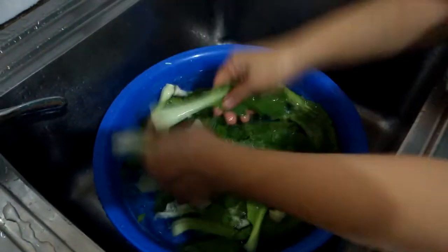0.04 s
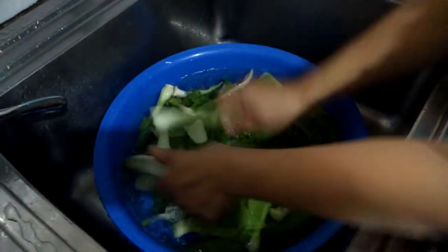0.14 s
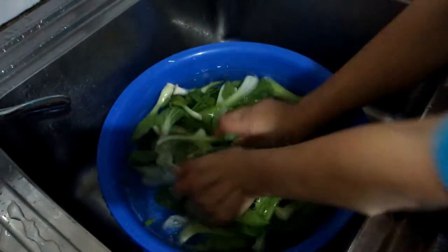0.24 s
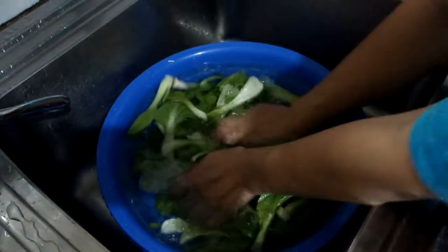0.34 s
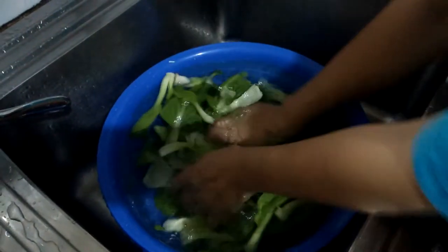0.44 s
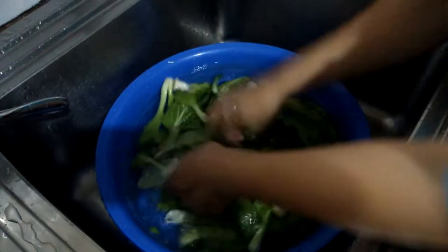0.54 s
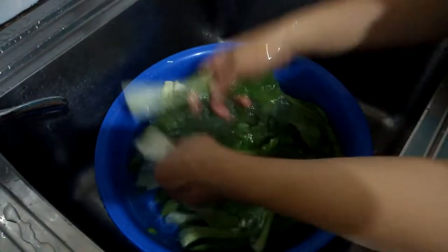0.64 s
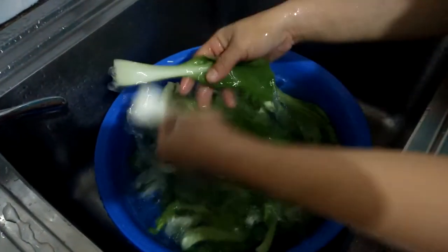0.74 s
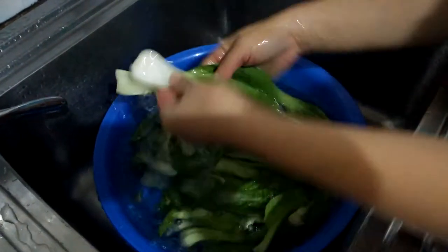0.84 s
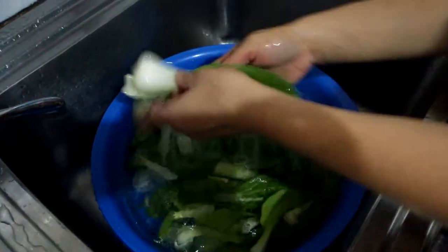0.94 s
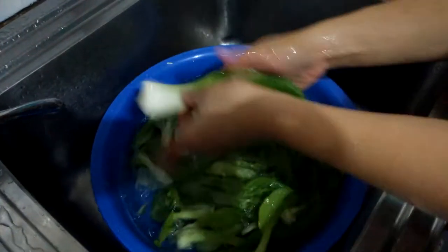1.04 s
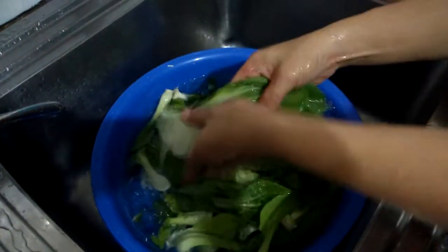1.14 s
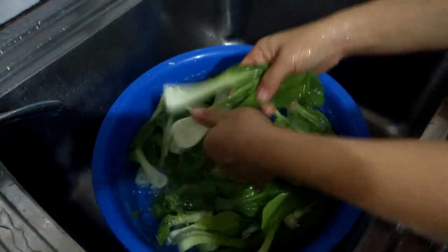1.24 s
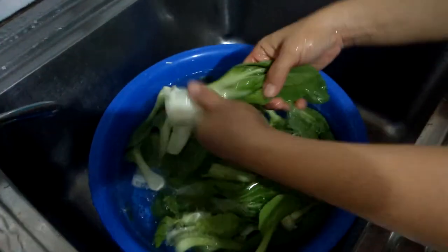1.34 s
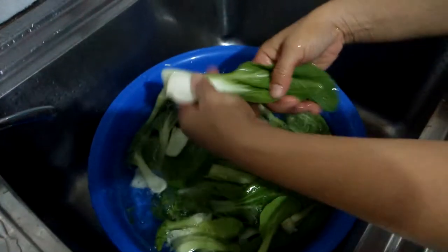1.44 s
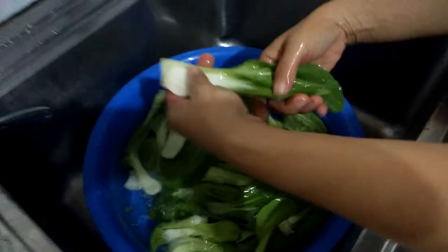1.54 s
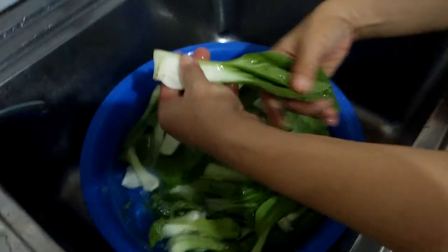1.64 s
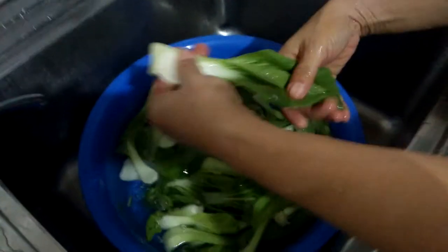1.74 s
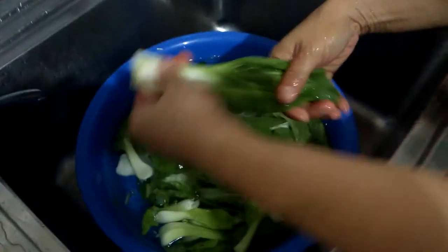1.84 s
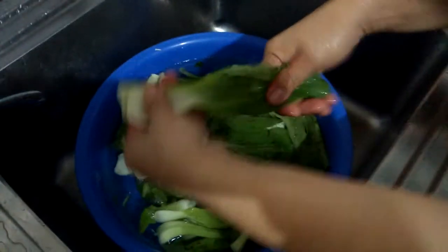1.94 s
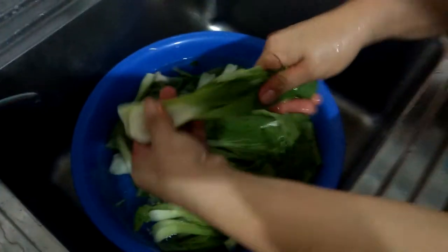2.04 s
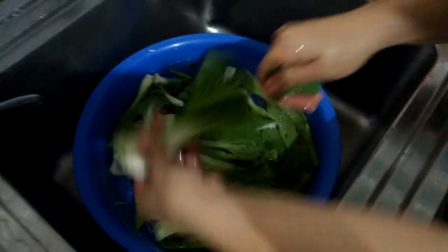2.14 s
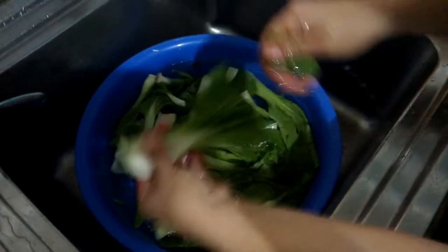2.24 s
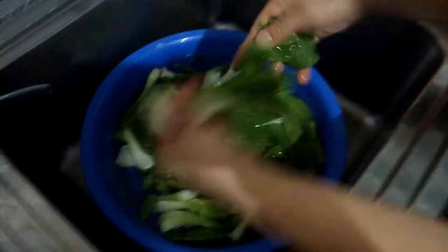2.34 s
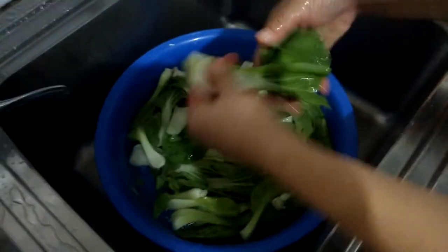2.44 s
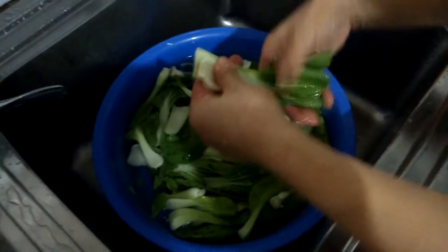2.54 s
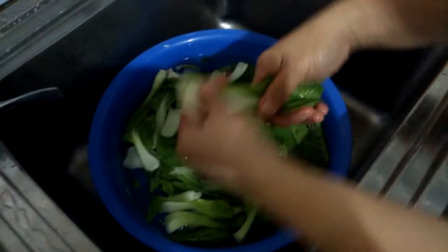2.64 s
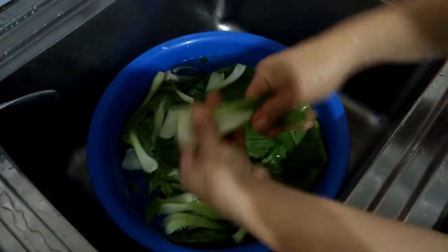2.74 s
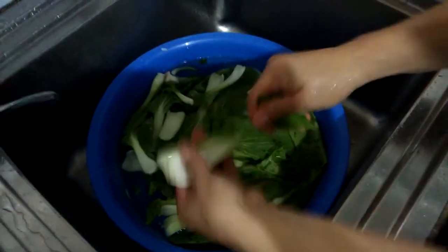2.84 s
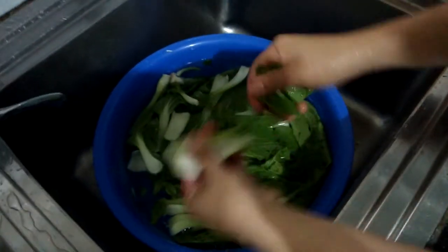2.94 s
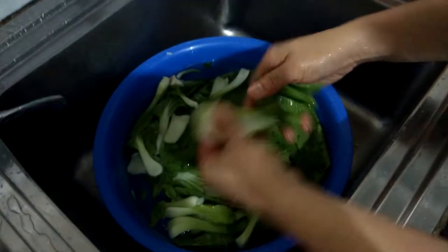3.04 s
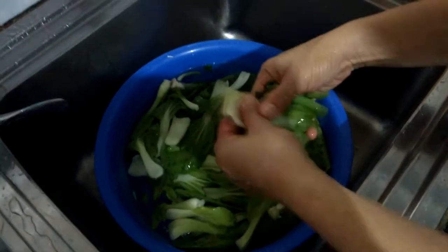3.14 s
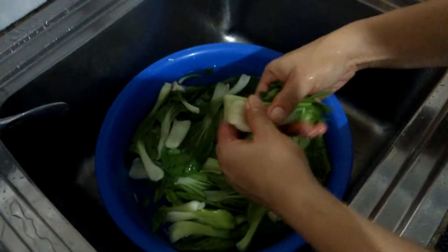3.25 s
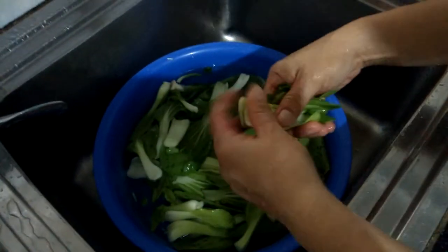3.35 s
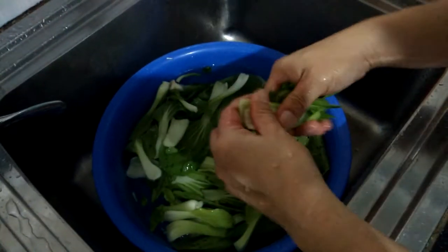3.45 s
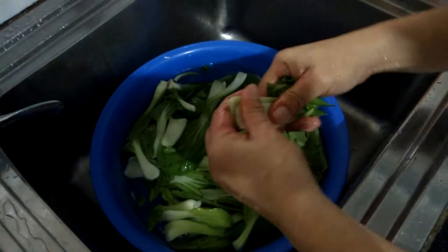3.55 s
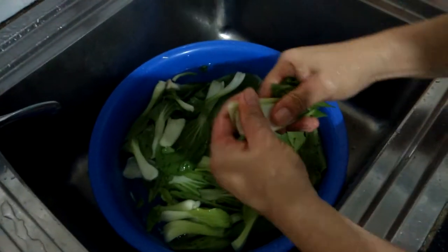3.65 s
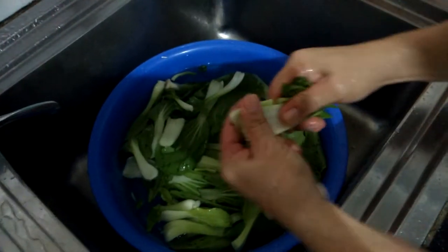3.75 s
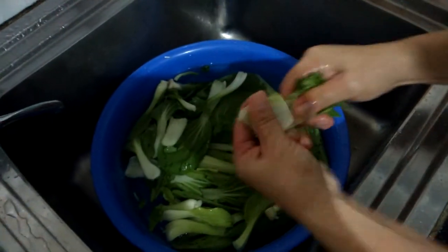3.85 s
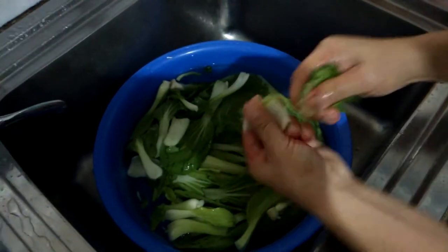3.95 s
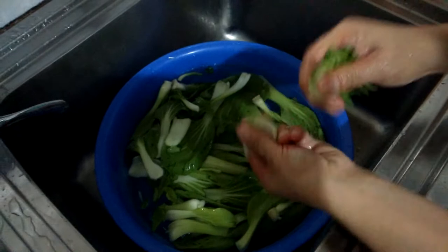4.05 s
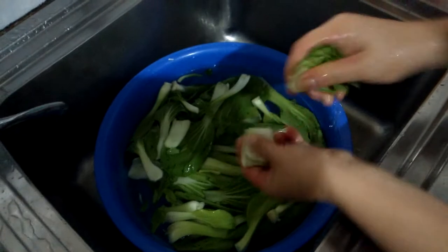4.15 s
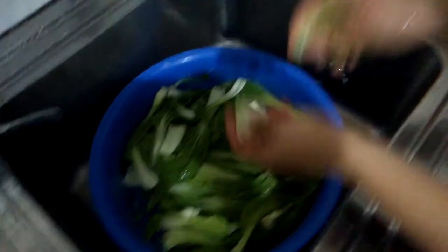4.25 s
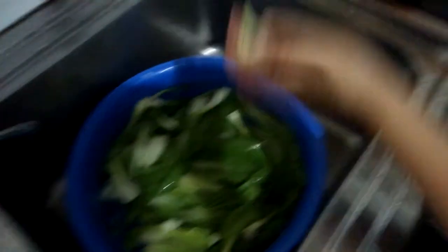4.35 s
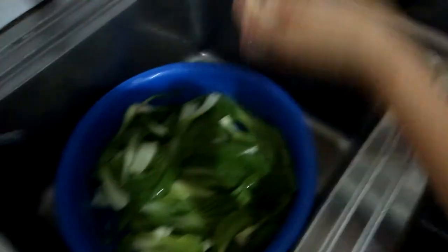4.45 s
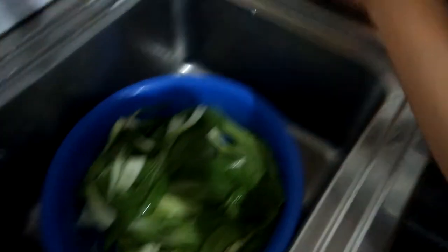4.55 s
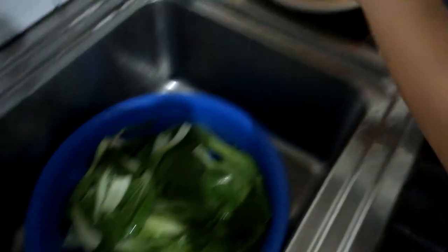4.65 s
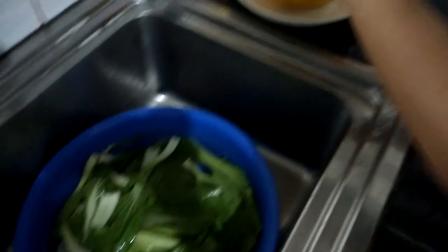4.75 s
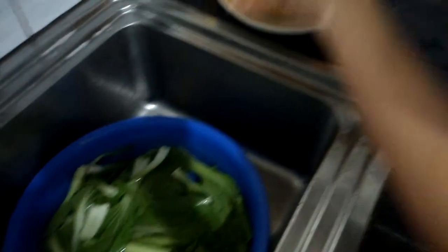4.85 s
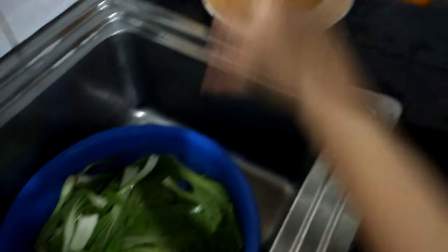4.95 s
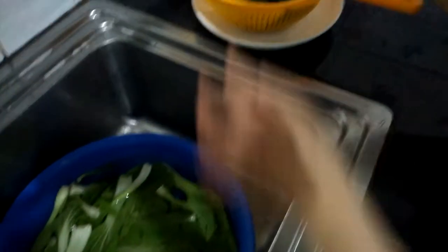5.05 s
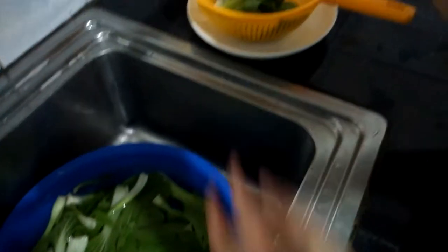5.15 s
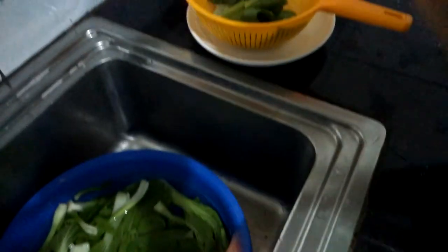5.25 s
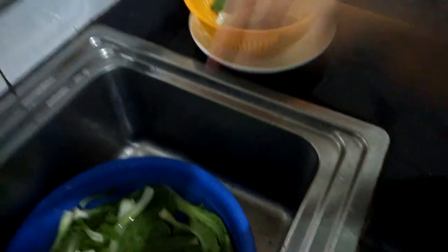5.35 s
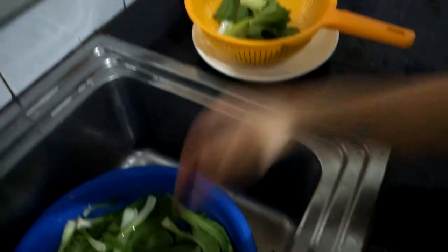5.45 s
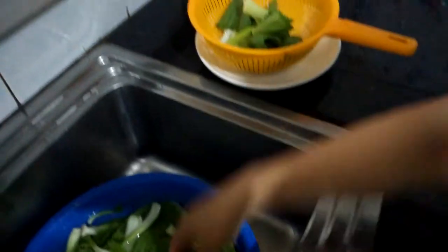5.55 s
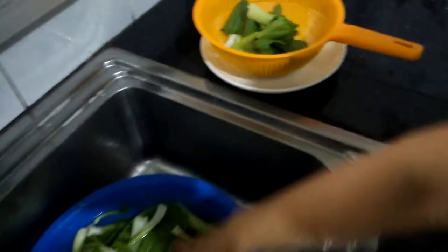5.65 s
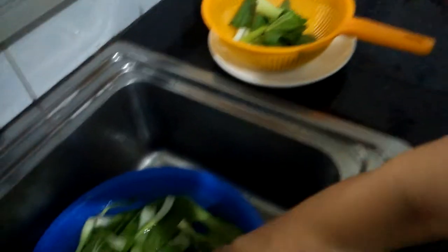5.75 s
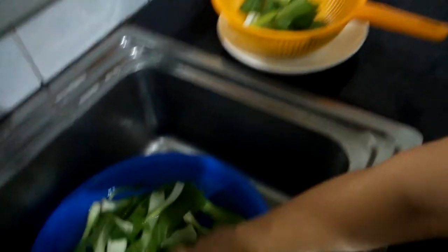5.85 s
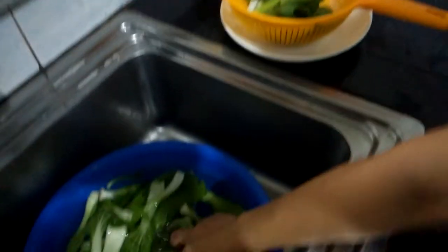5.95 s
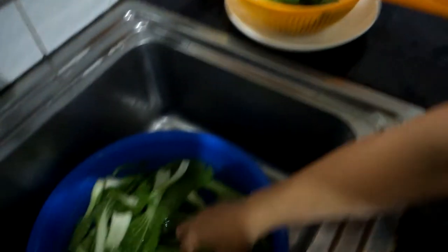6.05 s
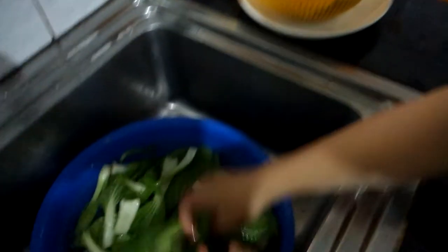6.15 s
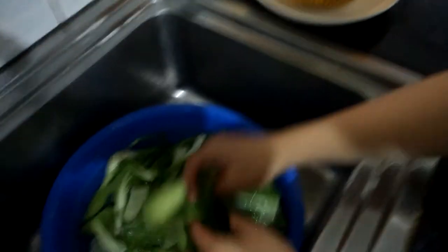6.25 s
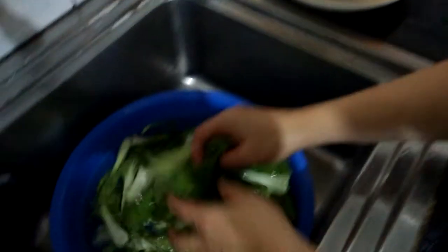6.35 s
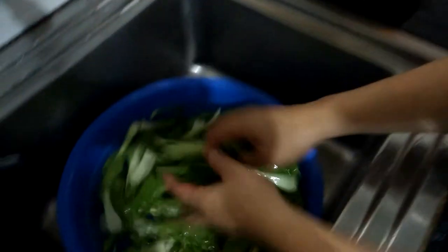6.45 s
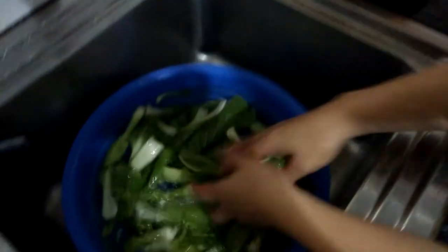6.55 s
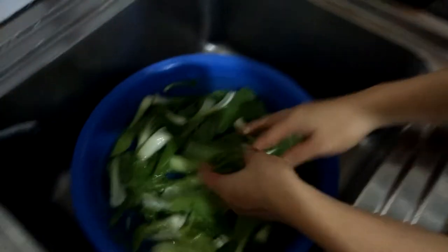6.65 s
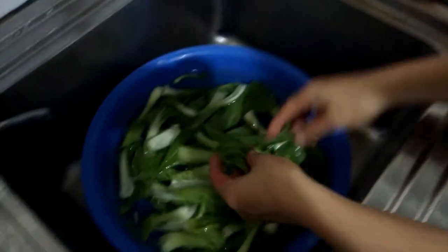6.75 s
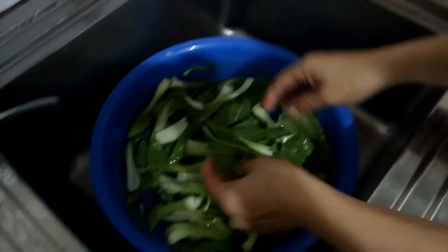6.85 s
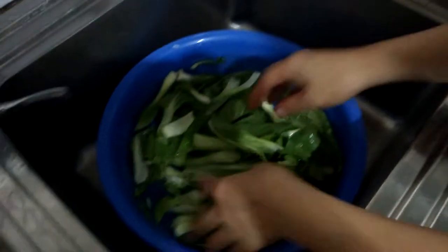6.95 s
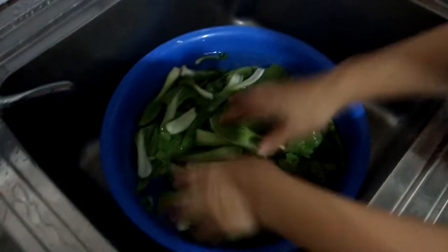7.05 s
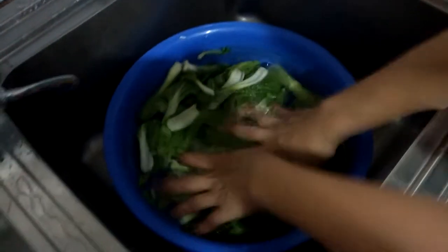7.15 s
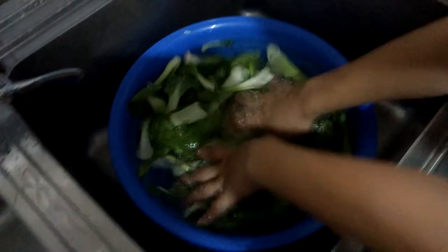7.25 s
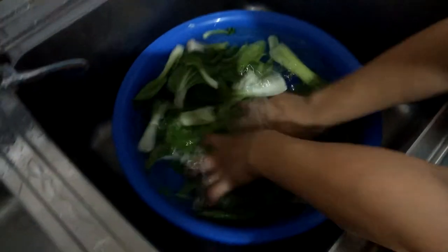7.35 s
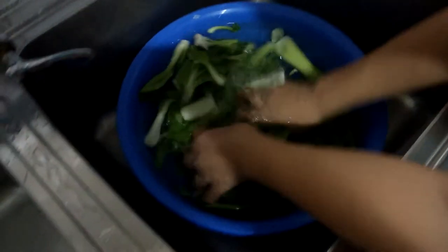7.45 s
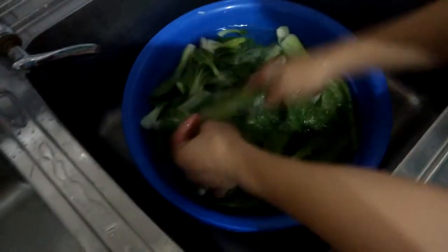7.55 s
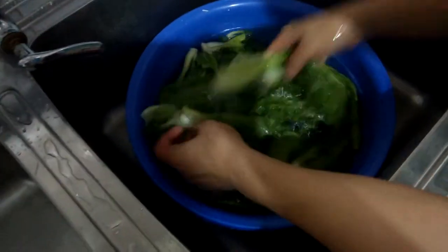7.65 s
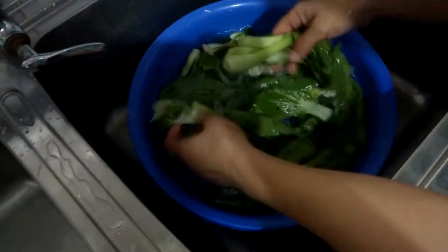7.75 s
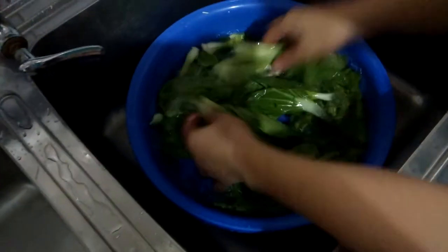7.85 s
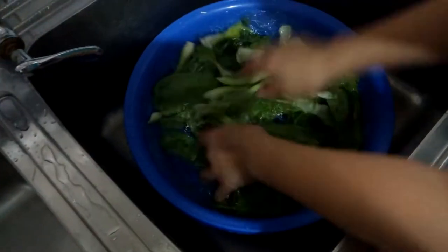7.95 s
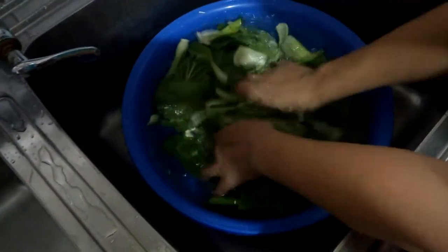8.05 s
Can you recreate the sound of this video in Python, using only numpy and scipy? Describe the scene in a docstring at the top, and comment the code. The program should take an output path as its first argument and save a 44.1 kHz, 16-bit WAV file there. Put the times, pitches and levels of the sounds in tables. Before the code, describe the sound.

Hands wash leafy greens in a plastic basin in a kitchen sink, heard close over a quiet, low room hum. For the first 1.3 seconds water sloshes, wet leaves rustle and bubbles plop, with small cracks and a soft basin rumble. A very faint, distant tone wavers briefly around 1.7 seconds. Stalks then snap crisply: a cluster near 2.2 seconds, a louder one near 2.85, and the sharpest cracks at about 3.8 and 4 seconds. A lull follows, with faint rustling and a light knock on a plastic colander near 4.9 seconds. From 5.9 seconds the rustling, small snaps and drips return. From about 7.2 seconds to the end, just after 8, the hands plunge deeper, giving fuller sloshes, many plops and low bumps of the basin. Hard walls add a short echo to the snaps, plops and knock.

```python
"""Wet leaves rustle and water sloshes over a low room hum: hands are washing greens in a plastic basin
in a steel sink. Stalks snap in short cracks, the bumped basin rumbles, trapped air rings as plopping
bubbles, and deep plunges push water against the basin. A faint far tone wavers briefly; later a colander
is knocked. The kitchen's hard walls echo the snaps, plops and knocks."""
import sys
import numpy as np
from scipy import signal
from scipy.fft import rfft, irfft, next_fast_len
from scipy.io import wavfile
from scipy.ndimage import uniform_filter1d, map_coordinates

SR = 44100
rng = np.random.default_rng(int(sys.argv[2]) if len(sys.argv) > 2 else 0)


def generate_wav(sig):
    """Save sig (samples, or channels by samples) to the path in sys.argv[1] as 16-bit PCM at SR."""
    pcm = np.round(np.clip(np.atleast_2d(sig).T, -1, 1) * 32767).astype(np.int16)
    wavfile.write(sys.argv[1], SR, pcm)


N = 357651


def amp(db):
    return 10 ** (np.asarray(db) / 20)


def unit(x):
    return x / np.sqrt(np.mean(x ** 2) + 1e-20)


def along(points, hz):
    """Read a table of (frequency, value) points at hz, on a log axis."""
    f, v = np.transpose(points)
    return np.interp(np.log(hz + 1), np.log(f + 1), v)


def wobble(rate):
    """A smooth random curve through `rate` points a second."""
    return map_coordinates(rng.standard_normal(N // 50), [np.arange(N) * rate / SR])


def filtered(x, response):
    """Scale each frequency of x by response(hz)."""
    m = next_fast_len(N + SR // 2)
    return irfft(rfft(x, m) * response(np.fft.rfftfreq(m, 1 / SR)), m)[..., :N]


def click(spectrum):
    """The most abrupt (minimum-phase) click with this spectrum, peak 1."""
    cepstrum = irfft(np.log(amp(along(spectrum, np.fft.rfftfreq(2048, 1 / SR)))))
    cepstrum[1:1024] *= 2
    cepstrum[1025:] = 0
    pulse = irfft(np.exp(rfft(cepstrum)))[:512]
    return pulse / np.abs(pulse).max()


def rush(spectrum, patchy_db):
    """Noise with this spectrum and random louder and softer patches, rms 1."""
    window = 2048 if spectrum[0][0] < 100 else 512
    hz, _, z = signal.stft(rng.standard_normal(N + 2048), SR, nperseg=window)
    patches = uniform_filter1d(rng.standard_normal(z.shape), size=6, axis=0)
    patches = unit(uniform_filter1d(patches, size=6, axis=1))
    return unit(signal.istft(z * amp(patchy_db * patches + along(spectrum, hz)[:, None]), SR)[1][:N])


def strokes(rows, rise, fall, rest_db=-120):
    """Level in dB: each row rises, holds and falls (rates in dB/s); their powers add."""
    t = np.arange(0, N, 32) / SR
    start, hold, db = np.transpose(rows)[:, :, None]
    each_db = db - rise * np.maximum(start - t, 0) - fall * np.maximum(t - start - hold, 0)
    power = amp(2 * each_db).sum(axis=0) + amp(2 * rest_db)
    return np.interp(np.arange(N) / SR, t, 10 * np.log10(power))


def scattered(level_db, scatter_db, count):
    """Random times, levels that follow level_db (a few far louder), and a bell-curve draw for each."""
    place, luck = rng.random((count, 2)).T
    db = level_db[(place * N).astype(int)] - scatter_db * np.log(luck + 0.028)
    return place * N / SR, db, rng.standard_normal(count)


def lay(starts, sounds):
    """Add up short sounds, each at its start time in seconds."""
    at = (starts * SR).astype(int)[:, None] + np.arange(sounds.shape[1])
    return np.bincount(at.ravel(), sounds.ravel(), N)[:N]


def bubbles(starts, size, hz, cycles, rise, length):
    """Short tones that swell and die; the pitch rises as each bubble nears the surface."""
    t = np.arange(length) / SR
    age = t * (hz / np.maximum(cycles, 1))[:, None]
    tone = np.sin(2 * np.pi * hz[:, None] * t * (1 + rise * (np.minimum(age, 1) - .5)))
    swell = (4 * age * np.exp(1 - 4 * age)) ** 2
    return lay(starts, size[:, None] * swell * tone)


def swarm(count, centre_hz, octaves, cycles, scatter_db, length):
    """Many bubbles at random times and pitches, rms 1."""
    luck, place = rng.random((count, 2)).T
    hz = np.clip(centre_hz * 2 ** (octaves * rng.standard_normal(count)), 300, 14000)
    size = amp(np.minimum(-scatter_db * np.log(luck + 1e-9), 4 * scatter_db))
    return unit(bubbles(place * N / SR, size, hz, np.full(count, cycles), rise=.1, length=length))


def with_snap_echo(level_db, echo_db):
    """Add to a level the room's fading echo just after each loud snap."""
    starts = np.transpose(STALK_SNAPS)[0]
    rows = [(start + .012, 0, db) for start, db in zip(starts, echo_db)]
    return 10 * np.log10(amp(2 * level_db) + amp(2 * strokes(rows, rise=2500, fall=124)))


# Fingers slide along wet leaves: t/s, hold/s, level/dB
LEAF_RUBS = [(0, 0.28, -52.5), (.25, 0.12, -49), (.62, .12, -52.5), (.84, 0.067, -54.5), (.96, 0.16, -47),
             (1.14, 0.15, -58), (1.41, 0.051, -62.5), (1.5, 0.027, -78), (1.75, 0.047, -62.5),
             (1.9, 0.045, -71.5), (1.99, .04, -67.5), (2.1, 0.1, -62.5), (2.44, 0.019, -68.5),
             (2.58, 0.013, -64.5), (2.78, 0.056, -60), (3.1, 0.025, -55.5), (3.2, .33, -64),
             (3.62, .09, -72.5), (3.74, 0.0072, -65.5), (4.25, 0.036, -60.5), (4.44, .01, -79),
             (4.57, 0.068, -63), (4.74, .1, -67.5), (4.88, 0.0067, -60.5), (4.95, 0.095, -69.5),
             (5.23, .06, -77), (5.32, .24, -67.5), (5.75, 0.19, -62.5), (5.93, 0.05, -53), (6.1, 0.16, -60),
             (6.27, .08, -58), (6.38, .1, -62), (6.52, 0.035, -60.5), (6.6, 0.032, -50), (6.86, 0.027, -48),
             (7.08, 0.023, -69), (7.19, 0.023, -58), (7.22, 0.092, -50), (7.32, 0.089, -44.5),
             (7.58, .1, -60), (7.69, .1, -54), (7.84, 0.072, -52), (8.02, .09, -46.5)]
# The hiss of the leaves: f/Hz, level/dB
LEAF_SPECTRUM = [(2240, -41.5), (3800, -13.5), (5620, -8), (5980, -11.5), (6340, -18.5), (6910, -1),
                 (10100, 0.5), (13800, -10.5), (14700, -11.5), (15000, -55)]


def leaf_rustle(rub_db, lurch):
    """Rubbed wet leaves crackle and hiss; the room's echo of each snap hisses briefly."""
    _, snap_db, _ = np.transpose(STALK_SNAPS)
    level_db = with_snap_echo(rub_db, snap_db - 26.5) + 1.1 * lurch
    crackle = swarm(count=4000, centre_hz=8000, octaves=0.21, cycles=2.7, scatter_db=-3, length=SR // 600)
    hiss = rush(LEAF_SPECTRUM, patchy_db=1.1)
    return amp(level_db) * (0.68 * hiss + 0.053 * crackle)


# Hands push through the water: t/s, hold/s, level/dB
WATER_STIRS = [(0, .1, -71), (.28, 0.023, -57.5), (.41, .02, -53.5), (.49, 0.13, -64), (.69, .02, -54),
               (.74, .07, -56.5), (.9, .02, -56.5), (.96, .1, -53.5), (1.15, .12, -65), (1.49, .02, -67.5),
               (1.8, 0.043, -67.5), (1.96, .04, -63.5), (2.06, .08, -70), (2.58, .03, -68.5),
               (3.1, 0.71, -77), (4.55, 0.16, -78), (4.88, 0.035, -63), (5.3, 0.26, -80.5),
               (5.8, 0.054, -70), (5.93, 0.018, -55.5), (6.15, 0.018, -62.5), (6.2, 0.055, -58.5),
               (6.3, 0.18, -64.5), (6.62, 0.013, -52), (6.8, 0.065, -60.5), (7.08, 0.015, -60.5),
               (7.24, 0.033, -52.5), (7.335, 0.044, -43), (7.5, .04, -56.5), (7.61, .04, -53),
               (7.7, 0.027, -47.5), (7.78, .02, -53), (7.87, 0.042, -55.5), (8.03, .03, -51.5),
               (8.1, .01, -41)]
# The wash of moving water: f/Hz, level/dB
WATER_SPECTRUM = [(210, -54), (350, -21.5), (524, -20.5), (706, 2), (939, -11), (1330, 1), (1760, 0),
                  (2400, 4), (4460, -11), (6000, -7), (7800, -33.5), (13200, -120)]


def water_slosh(stir_db, froth, lurch):
    """Stirred water makes a wash, joined by each snap's fading room echo; hard stirring adds bubbles."""
    _, snap_db, fullness_db = np.transpose(STALK_SNAPS)
    level_db = with_snap_echo(stir_db, snap_db + fullness_db - 36.5) + 5.1 * froth * lurch
    fizz = swarm(count=3500, centre_hz=2198, octaves=.5, cycles=18, scatter_db=3.5, length=SR // 120)
    wash = rush(WATER_SPECTRUM, patchy_db=1.8)
    return amp(level_db) * ((1 - 0.24 * froth) * wash + 0.57 * froth * fizz)


# The hum of the room: f/Hz, level/dB
HUM_SPECTRUM = [(15, -40.5), (25, -25), (53, -11), (160, -4), (231, -19), (284, 2.5), (374, -8),
                (460, -2.5), (695, 0.5), (874, 4), (1740, -6), (2190, -6.5), (3310, -22.5), (4250, -41),
                (6000, -56.5), (7800, -51), (13200, -120)]


def room_hum():
    """A quiet, almost steady low noise."""
    return amp(-66.5 + 0.27 * wobble(23)) * rush(HUM_SPECTRUM, patchy_db=2.5)


# The loudest fibres snapping and droplets bursting: t/s, level/dB, fullness/dB (how much low crack)
STALK_SNAPS = [(.0075, -35, -19), (0.0992, -39.5, -29), (0.164, -40.5, -29), (.2275, -29, -27),
               (.2604, -33, -13), (0.3278, -25.5, -7.5), (0.5946, -36, -40), (0.7482, -30.5, -46),
               (0.77, -29, -21.5), (0.8825, -32, -7), (0.9061, -22, -5), (.9244, -38, -9),
               (0.9787, -27, -20), (1.0091, -37, -24), (1.0273, -36, 1), (1.0686, -32, -11.5),
               (1.0984, -34.5, -10.5), (1.1953, -29.5, -7.5), (1.3843, -37.5, -20), (1.9701, -41.5, -32),
               (2.036, -20.5, -11.5), (2.1489, -37.5, -9), (2.1751, -33.5, -1.5), (2.1936, -28.5, 0),
               (2.199, -20, -10.5), (2.2109, -18.5, -0.4), (2.2168, -30.5, -4.5), (2.222, -27.5, -9),
               (2.227, -28, -6.5), (2.235, -26, -10), (2.769, -29.5, -17.5), (2.7923, -32, -13),
               (2.799, -33, -16.5), (2.8393, -11, -7.5), (2.8496, -21, -13), (2.8621, -16.5, -14),
               (2.872, -20, -17), (2.88, -16.5, -12.5), (2.897, -19, -6.5), (2.909, -25.5, -6.5),
               (3.09, -41.5, -29), (3.719, -52.5, -23.5), (3.828, -12, -5.5), (3.842, -26.5, -11),
               (3.9764, -5.5, -6), (4.0333, -17, -14.5), (5.3734, -44.5, -33), (5.3842, -54, -24),
               (5.4235, -48, -30), (5.9106, -26.5, -11), (5.9373, -30.5, -4.5), (6.0074, -37.5, -3),
               (6.2739, -34, -14), (6.3308, -33.5, -12), (6.5128, -39.5, -8), (6.5717, -32.5, -13),
               (6.5994, -37, 8), (6.6416, -40.5, -1), (6.85, -33, -17), (6.856, -35, -12),
               (7.063, -40.5, 2.5), (7.084, -45, -1.5), (7.2098, -29.5, -12), (7.2242, -40.5, 2.5),
               (7.2652, -27.5, -6), (7.3185, -24, -4.5), (7.3876, -33.5, 0), (7.4003, -27.5, -6.5),
               (7.4562, -33, -12), (7.4886, -27.5, -12.5), (7.6071, -35.5, 1), (7.6789, -32, -10.5),
               (7.6988, -34, 4.5), (7.7188, -33.5, -8), (7.7555, -30.5, 2.5), (8.009, -32, 0.5),
               (8.101, -32.5, 4.5)]
# The bright tick of a snap: f/Hz, level/dB
TICK_SPECTRUM = [(3000, -39.5), (4300, -34), (5200, -5.5), (6700, 5.5), (8000, 1.5), (9500, 0), (11800, -2),
                 (14000, -9)]
# The lower crack of a thick stalk: f/Hz, level/dB
CRACK_SPECTRUM = [(500, -32), (1300, -25.5), (2200, -9), (3000, -4.5), (3800, -11.5), (4800, -12.5),
                  (6000, -38.5)]


def stalk_snaps(rub_db):
    """A breaking fibre gives a burst of noise with a ragged tail; rubbing adds many small snaps."""
    when, small_db, draw = scattered(rub_db + 5.5, scatter_db=3.5, count=300)
    starts, db, fullness_db = np.hstack([np.transpose(STALK_SNAPS), [when, small_db, -10.5 + 7 * draw]])
    spread_s = np.interp(db, [-37.5, -21.5], [.011, .004])  # weak snaps spread out, strong ones are tight
    age = np.arange(SR // 40) / SR / spread_s[:, None]
    shape = (1 - np.exp(-age / 0.11)) ** 2 * (amp(-45 * age) + 0.78 * amp(-9 * age))
    bursts = rng.standard_normal(shape.shape) * shape
    bursts /= np.linalg.norm(bursts, axis=1)[:, None]
    thin = lay(starts, bursts * amp(db + 6)[:, None])
    thick = lay(starts, bursts * amp(db + fullness_db + 5.5)[:, None])
    ticks = signal.fftconvolve(thin, click(TICK_SPECTRUM))
    cracks = signal.fftconvolve(thick, click(CRACK_SPECTRUM))
    return (ticks + cracks)[:N]


# The basin is bumped: t/s, hold/s, level/dB
BASIN_BUMPS = [(.09, 0.009, -64), (.4, 0.17, -57), (.8, 0.012, -60), (1.0, .16, -57.5), (1.35, 0.014, -58),
               (1.53, 0.015, -64), (1.99, 0.018, -61.5), (2.21, 0.024, -62), (2.46, 0.014, -58),
               (2.84, 0.018, -67), (3.03, .02, -64), (3.41, 0.4, -64.5), (3.95, 0.089, -63.5),
               (4.31, 0.019, -62), (4.58, 0.033, -67), (4.9, .02, -64), (5.38, 0.048, -67),
               (5.74, 0.17, -65.5), (5.98, 0.044, -56.5), (6.17, 0.27, -63), (6.66, .05, -55.5),
               (6.8, 0.39, -65.5), (7.35, 0.059, -48), (7.48, .04, -51), (7.6, .1, -46.5),
               (8.06, .05, -52.5)]
# Its rumble: f/Hz, level/dB
BASIN_SPECTRUM = [(18, -43.5), (30, -11), (43, 0.5), (64, -1), (118, -8.5), (162, 2), (240, -28),
                  (300, -9.5), (390, -37), (660, -120)]


def basin_rumble():
    """The bumped basin rocks in the sink with a low, lumpy sway."""
    sway_db = strokes(BASIN_BUMPS, rise=270, fall=190, rest_db=-72) + 2 * wobble(14)
    return amp(sway_db - 4.5) * rush(BASIN_SPECTRUM, patchy_db=2.5)


# The loudest bubbles, drips and pops of juicy stalk: t/s, level/dB, f/Hz
LOUD_PLOPS = [(0.162, -34, 6160), (.258, -38, 5940), (.277, -35.5, 3450), (.3, -44.5, 5950),
              (.322, -40.5, 1510), (.359, -36.5, 2410), (0.397, -42, 1120), (.409, -34.5, 2200),
              (.468, -33, 2400), (.636, -42.5, 2500), (0.655, -41.5, 2450), (0.684, -33.5, 2710),
              (0.691, -32, 1980), (.736, -35, 1704), (0.738, -33.5, 1030), (0.737, -36.5, 2890),
              (.774, -35.5, 2200), (.839, -31.5, 2540), (.858, -40, 5880), (.879, -35, 2710),
              (0.902, -30.5, 2370), (.906, -36.5, 3100), (.927, -37, 2410), (.941, -33.5, 1248),
              (.942, -37, 3570), (.987, -38.5, 1210), (.998, -29.5, 2240), (.997, -37, 2840),
              (1.023, -38, 2370), (1.026, -34.5, 5080), (1.045, -44.5, 1246), (1.088, -35, 2540),
              (1.112, -35, 2760), (1.124, -37.5, 1640), (1.193, -32, 2930), (1.339, -45, 1940),
              (1.406, -43, 2890), (1.479, -47.5, 1590), (1.962, -38, 2070), (2.033, -33.5, 3030),
              (2.173, -40, 2600), (2.208, -25.5, 2360), (2.211, -23, 3106), (2.217, -28, 4114),
              (2.233, -29.5, 2914), (2.769, -43, 3460), (2.79, -41, 3360), (2.894, -29.5, 2670),
              (2.897, -32.5, 1960), (5.901, -27, 2070), (5.911, -33.5, 4480), (5.915, -33.5, 5120),
              (5.938, -35, 2670), (5.989, -38, 2630), (5.989, -40, 1550), (6.038, -41.5, 2110),
              (6.143, -42.5, 2630), (6.192, -42, 2110), (6.269, -37.5, 3230), (6.536, -44, 3620),
              (6.599, -29.5, 2800), (6.639, -36, 6150), (6.822, -44, 770), (6.839, -46, 764),
              (6.87, -45.5, 4340), (6.89, -45.5, 4335), (7.062, -38.5, 1030), (7.063, -42, 3076),
              (7.064, -43, 4500), (7.228, -35, 2780), (7.235, -39, 1510), (7.252, -37, 2020),
              (7.265, -31.5, 3100), (7.31, -32, 820), (7.319, -25.5, 6060), (7.318, -27, 5340),
              (7.318, -31.5, 2930), (7.327, -28.5, 1340), (7.349, -34.5, 3100), (7.356, -37, 2630),
              (7.358, -33.5, 4220), (7.381, -36.5, 690), (7.382, -38.5, 2070), (7.397, -36.5, 1160),
              (7.407, -34, 3620), (7.428, -40, 600), (7.455, -38.5, 6270), (7.486, -30.5, 6240),
              (7.485, -38.5, 2760), (7.514, -39.5, 1246), (7.515, -38.5, 2216), (7.604, -36, 4690),
              (7.642, -36.5, 1460), (7.686, -33, 2710), (7.698, -30, 3270), (7.711, -33, 2400),
              (7.754, -34.5, 3705), (7.758, -36, 4820), (7.778, -41.5, 1210), (7.793, -34, 2890),
              (7.805, -36.5, 5470), (7.856, -40, 2000), (7.867, -41.5, 4310), (7.921, -41, 1810),
              (8.004, -39.5, 3140), (8.025, -33, 2710), (8.1, -26, 2730), (8.101, -28, 2200)]


def bubble_plops(stir_db, rub_db, froth):
    """Trapped air rings: loud plops, small ones in stirred water, and high drips off rubbed leaves."""
    when, db, draw = scattered(stir_db + 5.5 - 30 * (1 - froth), scatter_db=1.6, count=900)
    small = [when, db, 2314 * 2 ** (.4 * draw)]
    when, db, draw = scattered(rub_db + 3 - 12 * (1 - froth), scatter_db=3, count=500)
    drips = [when, db, 7050 * 2 ** (.3 * draw)]
    starts, db, hz = np.hstack([np.transpose(LOUD_PLOPS), small, drips])
    life_s = .0113 * (2500 / hz) ** 0.43  # higher bubbles die sooner,
    life_s[len(LOUD_PLOPS):] *= 0.84  # as do all the small random ones, in the water and off the leaves
    life_s *= 0.78 + 0.22 * froth[(starts * SR).astype(int)]  # and pops in calm water
    return bubbles(starts, amp(db - 2.5), hz, cycles=hz * life_s, rise=0.05, length=SR // 50)


# Hands plunge deep: t/s, hold/s, level/dB
HAND_PLUNGES = [(.42, 0.0096, -51), (1.03, 0.017, -70), (7.33, 0.12, -50.5), (7.72, 0.014, -63),
                (8.1, .02, -53)]
# The surge they make: f/Hz, level/dB
SURGE_SPECTRUM = [(120, -23), (250, -5.5), (400, -1.5), (700, -11.5), (1000, 9.5), (1500, -20.5)]


def deep_plunges():
    """Water pushed against the basin makes a low, lumpy wash."""
    level_db = strokes(HAND_PLUNGES, rise=260, fall=110) + 2.6 * wobble(14)
    return amp(level_db) * rush(SURGE_SPECTRUM, patchy_db=4.5)


# The course of a faint far tone: t/s, f/Hz (base pitch), level/dB
TONE_PATH = [(1.5, 598, -100), (1.61, 588, -70), (1.66, 585, -77), (1.7, 585, -65), (1.75, 578, -74),
             (1.79, 588, -59), (1.82, 585, -76), (1.86, 584, -67.5), (1.93, 582, -98)]
# Its overtones: multiple of the base pitch, level/dB
TONE_OVERTONES = [(2, -18), (3, 9.5), (4, 1.5), (5, -24)]


def far_tone():
    """A few overtones that waver and break up in the echoes on their way."""
    t = np.arange(N) / SR
    times, hz, db = np.transpose(TONE_PATH)
    pitch = np.interp(t, times, hz) * (1 + 0.01 * wobble(30))
    phase = 2 * np.pi * np.cumsum(pitch) / SR
    tone = sum(amp(level) * wobble(28) * np.sin(k * phase) for k, level in TONE_OVERTONES)
    return amp(np.interp(t, times, db)) * tone


# The colander is knocked: t/s, level/dB
COLANDER_KNOCKS = [(4.868, -48.5), (4.888, -34.5), (4.897, -48), (4.93, -49.5)]
# The notes its plastic rings at: f/Hz, level/dB, fade/s (time to drop 60 dB)
COLANDER_NOTES = [(595, 1, 0.037), (1000, -7, 0.028), (1186, 3, 0.055), (1380, 5, 0.016), (1770, -1.5, .05),
                  (2120, -14.5, 0.013), (2754, -12, 0.041)]


def colander_knocks():
    """Each knock is a short rattle that rings the plastic; the light shell gives off no bass."""
    rattle = np.zeros(N + SR)
    t = np.arange(SR // 20) / SR
    for start, db in COLANDER_KNOCKS:
        burst = amp(db - 25.5 - 60 * t / 0.029) * rng.standard_normal(len(t))
        rattle[round(start * SR):][:len(t)] += burst
    t = np.arange(SR // 4) / SR
    ring = sum((-1) ** k * amp(db - 60 * t / fade_s) * np.sin(2 * np.pi * hz * t)
               for k, (hz, db, fade_s) in enumerate(COLANDER_NOTES))
    return filtered(signal.fftconvolve(rattle, ring)[:N], lambda hz: 1 / (1 + (480 / (hz + 1)) ** 6))


# How long the kitchen echoes: f/Hz, fade/s (time to drop 60 dB)
ECHO_TIMES = [(300, 0.39), (2000, 0.37), (6000, 0.35), (13000, 0.057)]


def kitchen_echo(x):
    """Treble dies first; hands and greens move, so each quarter second gets its own echo."""
    echo = np.zeros(N + 2 * SR)
    step, delay = SR // 4, round(.004 * SR)
    hz, t, z = signal.stft(rng.standard_normal((N // step + 1, SR // 3)), SR, nperseg=256)
    tails = signal.istft(z * amp(-60 * t / along(ECHO_TIMES, hz)[:, None]), SR, nperseg=256)[1]
    for k, tail in enumerate(tails):
        answer = signal.fftconvolve(x[k * step:][:step], tail / np.linalg.norm(tail))
        echo[k * step + delay:][:len(answer)] += answer
    return echo[:N]


# How alike left and right are: f/Hz, likeness (1 = the same)
STEREO_LIKENESS = [(60, .99999), (3400, .99999), (4800, 1), (6800, 0.86), (14000, 0.56)]


def stereo(x):
    """The microphone's two openings agree in the bass; in the treble each gets its own scatter."""
    z = signal.stft(x, nperseg=128)[2]
    scrambled = signal.istft(z * np.exp(2j * np.pi * rng.random(z.shape)), nperseg=128)[1][:N]
    width = lambda hz: np.tan(np.arccos(np.clip(along(STEREO_LIKENESS, hz), 0, 1)) / 2)
    side = filtered(unit(scrambled) * np.std(x), width)
    return np.array([x + side, x - side])


def scene():
    """Rubbing and stirring drive the leaves and water; only the short, sharp sounds echo."""
    rub_db = strokes(LEAF_RUBS, rise=300, fall=158, rest_db=-80)
    stir_db = strokes(WATER_STIRS, rise=280, fall=112, rest_db=-81.5)
    froth = np.clip((stir_db + 72) / 14, 0, 1)  # calm water traps no air
    lurch = wobble(25)  # leaves and water swell and dip together
    washing = leaf_rustle(rub_db, lurch) + water_slosh(stir_db, froth, lurch)
    backdrop = room_hum() + basin_rumble() + deep_plunges() + far_tone()
    pops = stalk_snaps(rub_db) + bubble_plops(stir_db, rub_db, froth)
    knocks = colander_knocks()
    echo = kitchen_echo(amp(-10) * pops + amp(-2.5) * knocks)
    return stereo(washing + backdrop + pops + knocks + echo)


# How strongly the microphone picks up each frequency: f/Hz, level/dB
MIC_RESPONSE = [(25, -5.5), (40, -11), (52, 1.5), (14100, 2), (14500, -28), (15600, -38.5)]


def record(dry):
    """The microphone weakens the deepest bass and cuts off the highest treble."""
    top_hz = 15649
    return filtered(dry, lambda hz: amp(along(MIC_RESPONSE, hz)) * (hz < top_hz))


dry = scene()
out = record(dry)
generate_wav(out)
```